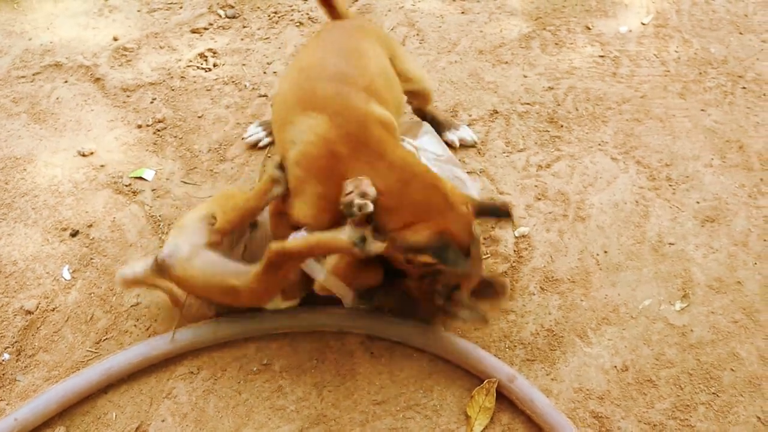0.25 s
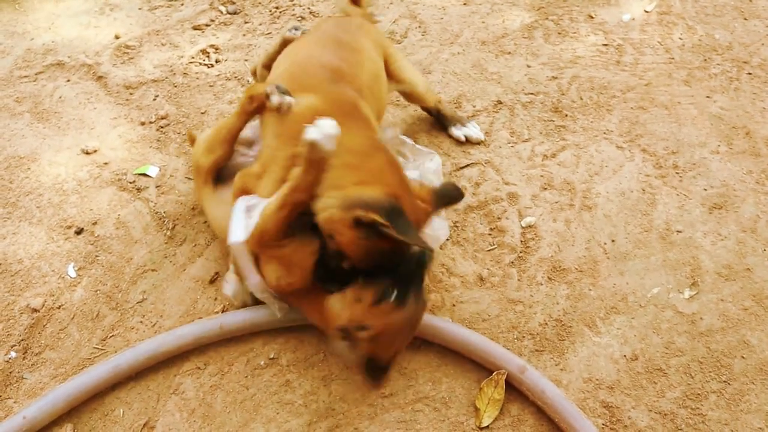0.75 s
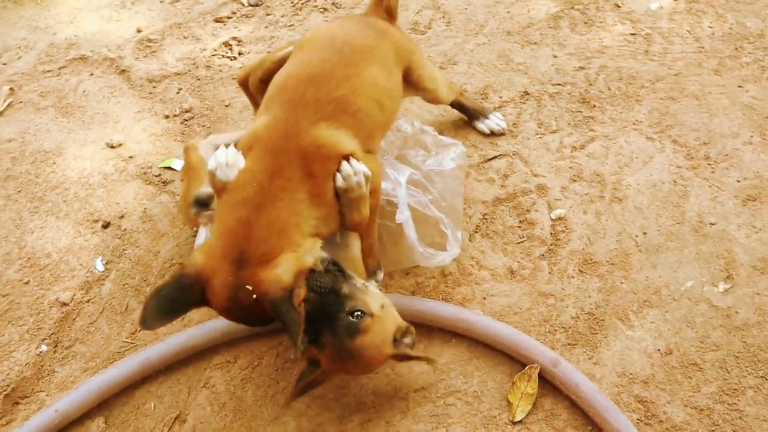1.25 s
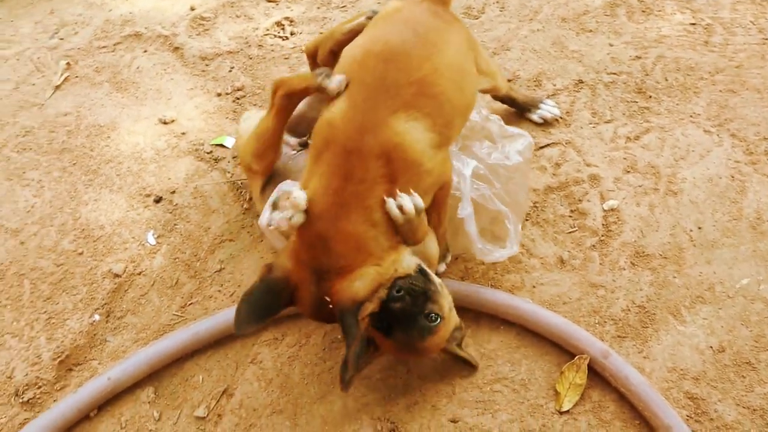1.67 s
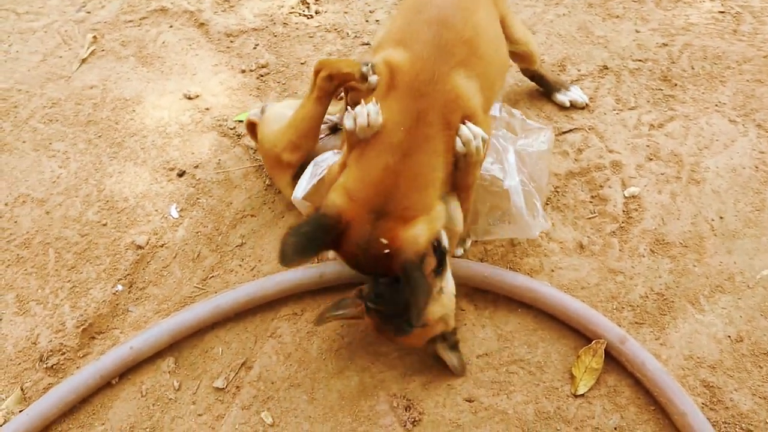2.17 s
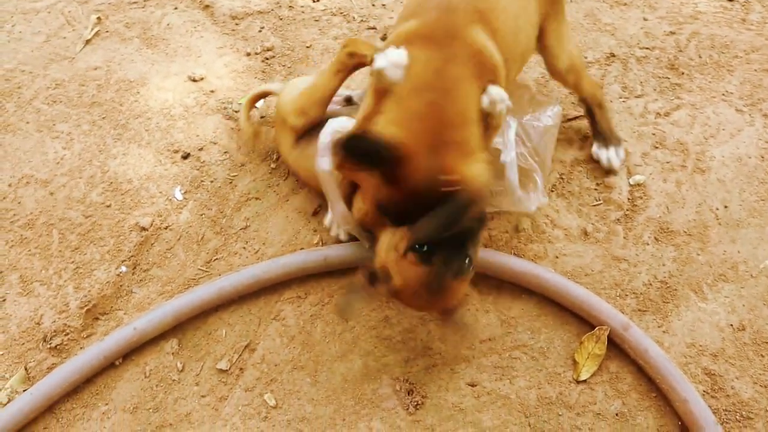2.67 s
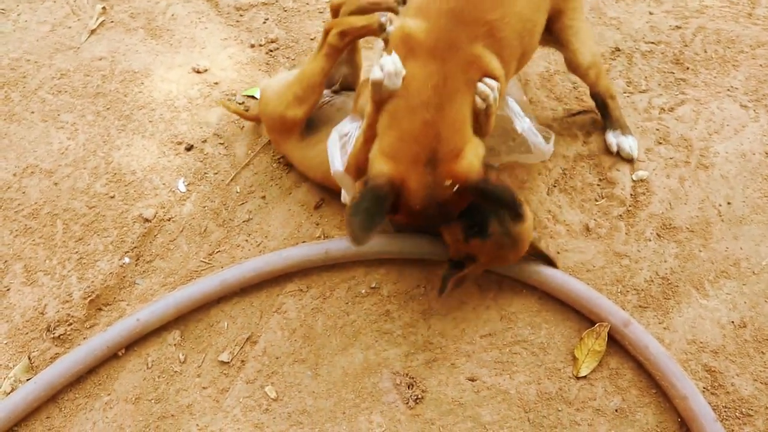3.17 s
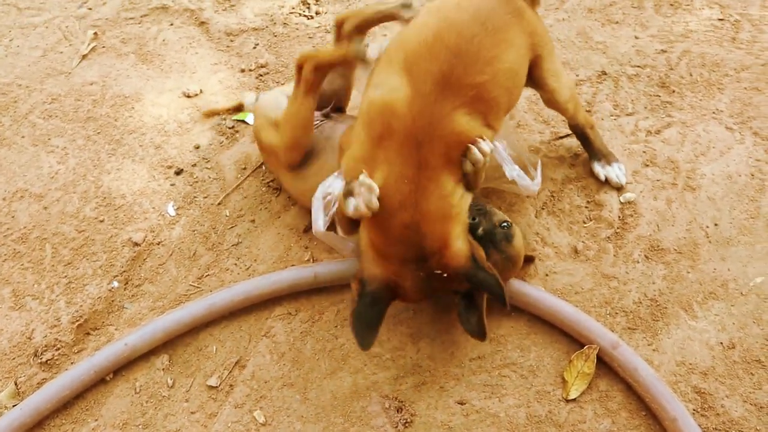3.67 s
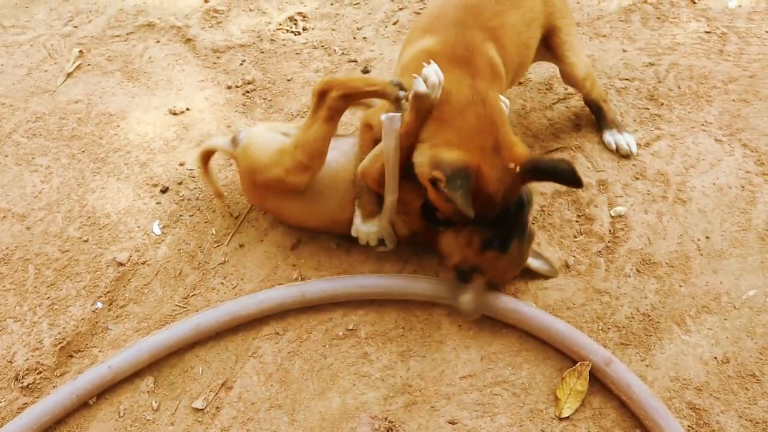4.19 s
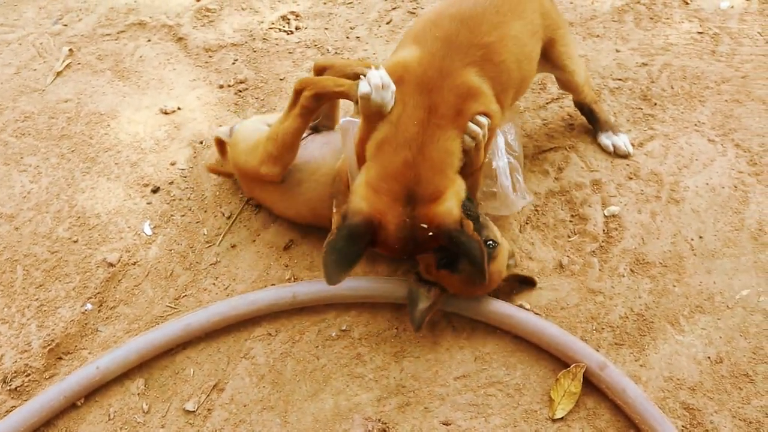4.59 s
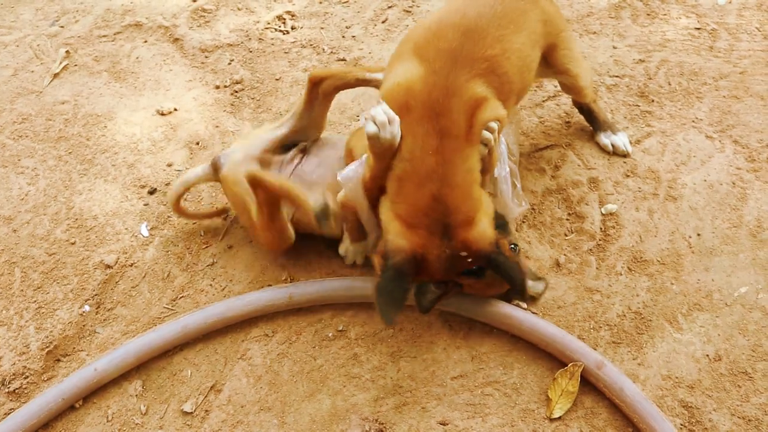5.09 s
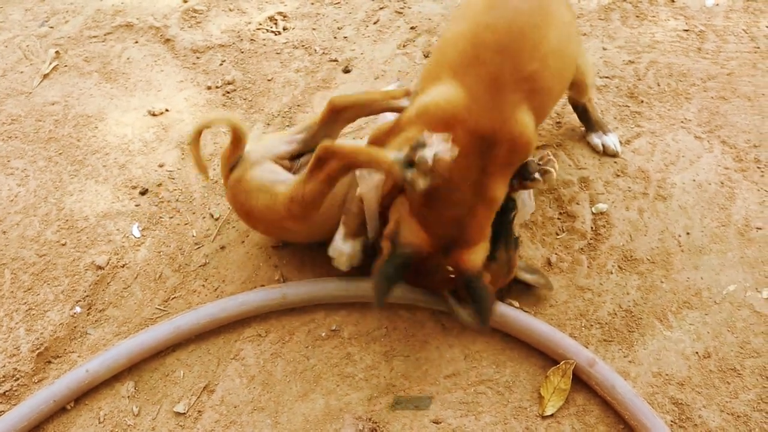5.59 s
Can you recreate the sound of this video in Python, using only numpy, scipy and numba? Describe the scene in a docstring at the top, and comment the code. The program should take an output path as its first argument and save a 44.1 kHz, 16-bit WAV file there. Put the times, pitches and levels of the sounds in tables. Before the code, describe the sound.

Two puppies growl and snarl in short rough bursts while wrestling, a plastic bag crackling beneath them and a small bird whistling in the background.

```python
"""Puppies wrestling over a plastic bag

Two puppies wrestle on bare earth, close to a pair of microphone ports. Vocal-fold puffs excite chest,
throat and mouth resonances: growls through shut jaws, snarls as they open; panting is filtered noise.
A plastic bag crackles as random impulses and ringing bursts. A bird whistles further off in gliding
sines, with a thin far tone, a wavering hum, filtered-noise wind and the steady air of a village yard."""
import sys
import numpy as np
from scipy import signal
from scipy.fft import rfft, irfft
from scipy.io import wavfile
from scipy.ndimage import uniform_filter1d
from numba import njit

SR = 44100
rng = np.random.default_rng(int(sys.argv[2]) if len(sys.argv) > 2 else 0)


def put_to_file(sound):
    """Save the sound as 16-bit audio at rate SR, in the file named by the first command-line argument."""
    columns = np.atleast_2d(sound).T  # one column per channel
    safe = np.clip(columns, -1, 1)
    whole_steps = np.round(safe * 32767)
    wavfile.write(sys.argv[1], SR, whole_steps.astype(np.int16))


N = 257984   # length in samples

# Growls, one curve a breath: t/s, throat level/dB, fold rate f/Hz, shut-mouth level over throat/dB
GROWLS = [
    [(0, -20.5, 188.7, -23), (.1, -27, 158.6, 0), (.26, -15.5, 283.2, -9.5), (.32, -24, 263.8, -6),
     (.39, -21, 250.6, -5.5), (.48, -21, 191.1, -10), (.505, -16.5, 215.3, -6), (.52, -28, 344.4, -25),
     (.56, -31, 263.8, -17), (.6, -26, 314.7, -11), (.65, -26.5, 352.5, -23), (.68, -23.5, 328, -12),
     (.7, -19.5, 336, -12.5), (.735, -31, 256.3, 1), (.76, -58, 238.3, -1)],
    [(.83, -33.5, 125.1, -16), (.88, -31, 113.8, -6.5), (.945, -25, 112.5, -8.5), (1.005, -28, 179.7, -35),
     (1.025, -52, 177.6, 0)],
    [(1.035, -30, 109.7, -6), (1.075, -32, 115.1, 4), (1.088, -44, 177.6, -13)],
    [(1.1, -40.5, 176.7, -25), (1.135, -27, 177, -11), (1.18, -30.5, 202.7, -25),
     (1.246, -20.5, 330.8, -12.5), (1.29, -28.5, 304.6, -13.5), (1.345, -26, 274.9, -16.5),
     (1.38, -37.5, 255.3, -12), (1.42, -74, 210.6, -6)],
    [(1.47, -50, 131, -9), (1.49, -28, 126.7, -7.5), (1.55, -26, 132.8, -6.5), (1.66, -23.5, 175.6, -7.5),
     (1.79, -24.5, 176.8, -5), (1.87, -20, 304.6, -11.5), (1.98, -29.5, 273.9, -16),
     (2.045, -27.5, 151.2, -15), (2.1, -22.5, 184.6, -34), (2.14, -25, 225.2, -13), (2.17, -29, 213.7, -14),
     (2.2, -27.5, 233.4, -2), (2.225, -27.5, 289.6, 4), (2.25, -35, 249.2, 0), (2.28, -33.5, 288.8, 9),
     (2.33, -32.5, 242.8, -5), (2.37, -33, 241.1, -14), (2.4, -40.5, 195, -16), (2.42, -51, 189.1, -16)],
    [(2.43, -35, 191.7, -7), (2.457, -38.5, 170, -9)],
    [(2.472, -37, 156.6, -11), (2.49, -36.5, 154.1, -5), (2.56, -32, 144.4, -7.5),
     (2.634, -35.5, 134.7, -4), (2.69, -29.5, 128.5, -3.5), (2.81, -36.5, 125, -10), (2.87, -30, 126, -9),
     (2.92, -34, 190.5, -9), (2.955, -28.5, 204.7, -0.5), (3.05, -36.5, 260.2, -16), (3.09, -44, 255.6, -2)],
    [(3.11, -38, 252.6, -10), (3.155, -26.5, 289.9, -40), (3.18, -30, 324.4, -9), (3.21, -27, 313.9, -13),
     (3.3, -30, 248.9, -13), (3.355, -29, 211, -11), (3.4, -59, 190.1, -17)],
    [(3.66, -26.5, 154.2, -22), (3.68, -36, 180, -13), (3.71, -28, 205.3, -14), (3.78, -25.5, 270.9, -10),
     (3.91, -26, 214.7, -9), (3.98, -21, 263.2, -13.5), (4.09, -23, 186, -25), (4.19, -24.5, 193.5, -14.5),
     (4.24, -24, 180.4, -7.5), (4.26, -23.5, 204.9, -23), (4.32, -22, 209.6, -16),
     (4.345, -25.5, 261.8, -14), (4.37, -34, 280.6, -16), (4.41, -31, 265.5, -16),
     (4.43, -35.5, 222.6, -20), (4.45, -44.5, 183, -22), (4.465, -64, 164.7, -13)],
    [(4.57, -65, 122.6, -11), (4.59, -39.5, 125.1, -8.5), (4.68, -36, 226.3, -14),
     (4.75, -30.5, 257.5, -2.5), (4.82, -29, 285.2, -3), (4.9, -25, 257.4, -16), (4.98, -31.5, 229.2, -12),
     (5.02, -30.5, 240, -29), (5.08, -29, 315.3, -13), (5.115, -33, 303.6, -21), (5.14, -54, 294, -9)],
    [(5.405, -40, 107.9, -30), (5.425, -32.5, 109.4, -11.5), (5.48, -31.5, 120, -13),
     (5.505, -30, 160, -11.5), (5.53, -26, 222.7, 1), (5.565, -23.5, 283.3, 1), (5.62, -26.5, 237.4, -11),
     (5.68, -25, 270.3, -13), (5.71, -21.5, 227.8, -11), (5.77, -29, 204.4, -4), (5.8, -27, 218.8, -2),
     (5.84, -19.5, 249.2, -7.5), (5.85, -20, 249.4, -8)],
]
# Irregular fold vibration: t/s, roughness (0-1), weakening of every other puff/dB
FOLD_ROUGHNESS = [(0, .62, 0), (.28, .55, 3), (.42, .45, 6), (.47, .55, 2), (.52, .36, 5), (.74, .36, 5),
                  (.8, .55, 0), (1.0, .5, 0), (1.04, .25, 0), (1.08, .25, 0), (1.14, .35, 0), (1.2, .55, 2),
                  (1.47, .45, 0), (1.62, .52, 0), (1.8, .6, 3), (2.03, .6, 2), (2.09, .3, 0), (2.14, .2, 0),
                  (2.2, .22, 1), (2.25, .42, 3), (2.4, .3, 2), (2.45, .55, 0), (2.87, .52, 0),
                  (2.92, .4, 0), (3.08, .4, 2), (3.12, .6, 0), (3.75, .6, 3), (4.17, .62, 2),
                  (4.23, .32, 0), (4.33, .3, 3), (4.4, .2, 1), (4.46, .18, 0), (4.58, .55, 0),
                  (4.75, .42, 2), (4.88, .4, 3), (4.92, .26, 0), (5.0, .34, 2), (5.1, .45, 4),
                  (5.45, .45, 0), (5.51, .25, 0), (5.57, .22, 0), (5.68, .3, 1), (5.8, .36, 1),
                  (5.85, .5, 0)]
# Low rough growl of the other puppy: t/s, source level against the first throat/dB, fold rate f/Hz
OTHER_PUPPY = [(0, -10, 130), (.5, -6, 150), (.75, -6, 140), (1.0, -20, 120), (2.05, -8, 130),
               (2.15, -5, 120), (2.4, -10, 130), (3.0, -8, 130), (4.15, -8, 110), (4.33, -2, 120),
               (4.45, -12, 120), (4.8, -4, 150), (5.05, -2, 140), (5.45, -20, 130), (5.55, 0, 160),
               (5.85, 0, 150)]
PUFF_SPREAD_DB, WEAK_PUFF_DB = 2.4, 3   # scales of the uneven puff strength that the mouth gets
# Flaps of the soft palate that chop the growl: first flap t/s, last flap t/s, flap rate f/Hz, depth/dB
PALATE_FLAPS = [(1.525, 1.601, 25.9, 6), (2.095, 2.131, 30.5, 6), (2.492, 2.602, 28.4, 7),
                (2.915, 3.042, 23.5, 9), (3.743, 4.026, 24.7, 8), (4.265, 4.409, 29.4, 4),
                (4.589, 4.692, 30.4, 7)]

# Chest and nose resonances: f/Hz, width/Hz, level/dB
CHEST = [(126, 98, 2), (265, 88, 1.5), (660, 38, -1.5)]
# Ringing of the throat added to the chest: t/s, level/dB (with the jaws shut)
THROAT_RING = [(0, 1), (.25, 7.5), (.55, -2), (.9, -11), (1.15, 1), (1.35, -20), (1.6, 8.5), (1.9, 3.5),
               (2.2, -4.5), (2.6, 2), (3.2, -2), (3.75, 4.5), (4.1, 5), (4.35, 9), (4.7, -0.5), (5.05, 4),
               (5.5, 4), (5.72, 3), (5.85, 6.5)]
# Pass band of the growl in chest and throat: lower f/Hz, upper f/Hz
THROAT_BAND_HZ = [148, 562]
THROAT_WIDTH_HZ, THROAT_EDGE_HZ = 140, 806
THROAT_HUSH = 0.5   # share of the throat's ring lost as the jaws open

# Resonances of the shut mouth: t/s, throat f/Hz, mouth f/Hz
SHUT_MOUTH = [(.08, 444, 1340), (.2, 563, 1100), (.3, 570, 1290), (.38, 545, 1360), (.45, 517, 950),
              (.69, 454, 1074), (.94, 564, 1310), (1.25, 465, 1260), (1.5, 570, 1300), (1.69, 620, 1510),
              (1.86, 605, 1362), (1.96, 440, 1230), (2.4, 447, 1450), (2.5, 550, 1380), (2.85, 504, 1240),
              (3.15, 480, 1440), (3.33, 550, 1610), (3.72, 494, 1130), (3.85, 552, 1155), (4.19, 448, 1480),
              (4.6, 596, 1377), (5.0, 450, 1450), (5.12, 495, 1642), (5.45, 502, 1440), (5.78, 480, 1420),
              (5.85, 610, 1380)]
# Snarls with the jaws open: start t/s, loudest t/s, end t/s, first level/dB, loudest level/dB,
# last level/dB, first mouth f/Hz, last mouth f/Hz, front-of-mouth level over mouth/dB
SNARLS = [(-.02, 0.014, 0.067, 2, -21.5, -21, 1590, 1540, -12),
          (0.19, 0.223, 0.22, -31, -24, -28, 1150, 1200, -22),
          (0.24, 0.27, 0.28, -27.5, -17.5, -24.5, 1360, 1430, -19.5),
          (0.326, 0.37, 0.42, -29, -28.5, -27, 1500, 1150, -16),
          (0.455, 0.516, 0.59, -21.5, -15.5, -31.5, 960, 1555, -15.5),
          (0.575, 0.608, 0.6, -29, -19, -15.5, 1600, 1650, -17.5),
          (0.707, 0.726, 0.74, -24, -19.5, -18.5, 1980, 2640, -14),
          (1.043, 1.073, 1.06, -21, -25, -26, 1937, 1490, -11),
          (1.135, 1.143, 1.165, -23, -16.5, -25, 1240, 1400, -20.5),
          (1.349, 1.38, 1.404, -41, -34, -37.5, 2410, 2552, -28),
          (2.091, 2.218, 2.295, -15.5, -14.5, -12.5, 1050, 1610, -15),
          (2.299, 2.359, 2.388, -26, -22.5, -29, 1510, 1670, -14.5),
          (2.898, 2.965, 3.066, -26.5, -16.5, -31, 990.4, 1470, -23),
          (4.251, 4.347, 4.437, -18, -10, -26, 1270, 1627, -17.5),
          (4.727, 4.778, 4.785, -33, -24.5, -21.5, 1420, 1520, -14.5),
          (4.788, 4.793, 4.93, -25.5, -19.5, -28.5, 1580, 1570, -15.5),
          (4.866, 4.884, 4.864, -22, -14.5, -18.5, 1540, 1520, -15),
          (4.905, 4.921, 5.006, -21, -15, -33.5, 1631, 1618, -11.5),
          (5.501, 5.566, 5.67, -26.5, -13.5, -32.5, 1480, 1766, -13),
          (5.634, 5.66, 5.76, -25.5, -20.5, -36, 1560, 1445, -12.5)]
JAWS_OPEN_S, JAWS_CLOSE_S = 0.0082, 0.0088   # time for the mouth to gain or lose 20 dB
JAW_GLIDE = 2.64   # above 1 the mouth resonance moves early in a snarl and then settles
SHUT_FRONT_DB = -16   # front-of-mouth drive against the shut mouth
FRONT_SWELL = 0.09   # extra dB of front drive for each dB of snarl

MOUTH_WIDTH_HZ, SLACK_WIDTH_HZ = 152, 280   # first of two resonators in cascade
TAUT_FROM_DB, TAUT_OVER_DB = -38, 12   # a quiet mouth rings broadly; it sharpens as it gets loud
MOUTH_LAG_S = 0.002022   # the mouth rings after the throat
# Side resonances of the cheeks: f/Hz, width/Hz, level with a slack mouth/dB, with a taut mouth/dB
CHEEKS = [(1037, 370, -9, -20), (2020, 405, -26.5, -17.5)]
# Second mouth resonance moved by the tongue: t/s, lowest f/Hz, level with the jaws open/dB
SECOND_MOUTH = [(0, 2530, 3), (.25, 2650, 1.5), (.5, 2760, -2), (.6, 2404, 4), (1.05, 2581, -2),
                (1.6, 2202, 5), (2.05, 2750, -6), (2.1, 2195, -1), (2.2, 2722, 0.5), (2.235, 2800, 4),
                (2.27, 2800, 0), (2.4, 2420, 4), (2.95, 2449, 3), (4.2, 2680, 2), (4.31, 2690, 0),
                (4.44, 2540, 4.5), (4.75, 2305, -0.5), (4.9, 2485, 1.5), (5.5, 2544, -5), (5.57, 2735, -2),
                (5.85, 2598, 0)]
SECOND_FOLLOWS = 1.42   # lowest ratio of the second mouth resonance to the first
# Muzzle resonances: f/Hz, width/Hz, level within the muzzle sound/dB
MUZZLE = [(3636, 500, -2.5), (4470, 440, -9.5), (6740, 1400, -1.5)]
MUZZLE_UNDER_DB = -14   # muzzle against the front drive where the second mouth table reads 0 dB
LUMPS_SHUT_DB, LUMPS_OPEN_DB, LUMPS_PER_S = 1.7, 1.6, 45

# Panting between growls: start t/s, end t/s, first level/dB, last level/dB
PANTS = [(0.776, 0.8, -73, -37), (1.39, 1.466, -40, -49), (3.325, 3.566, -40.5, -44),
         (3.538, 3.69, -51, -68), (5.202, 5.321, -55, -56)]
# Resonances of the panting mouth: f/Hz, width/Hz, relative level/dB
PANT_MODES = [(713, 110, 13.5), (1074, 950, 8.5), (2050, 120, 7), (2530, 180, -4), (3700, 1500, -4)]

# Pressure of the struggle on the bag: t/s, crackle level/dB
BAG_PRESSURE = [(0, -31), (.19, -41.5), (.5, -38), (1.0, -38), (1.3, -44), (1.7, -49.5), (2.0, -37.5),
                (2.33, -41), (2.44, -59.5), (2.74, -48.5), (3.04, -38), (3.27, -52.5), (3.7, -50),
                (3.76, -38.5), (4.37, -34.5), (4.4, -50), (4.63, -58), (4.93, -38.5), (5.03, -48),
                (5.31, -57.5), (5.55, -41.5), (5.85, -34.5)]
# Colour of the creases: f/Hz, relative level/dB
BAG_COLOUR = [(120, -25.5), (600, 8), (1200, 7.5), (2500, 1), (4000, -1.5), (5500, -8), (7500, -12.5),
              (10000, -20), (13000, -29.5), (15500, -35)]
# Crumpling by a paw or a body: loudest t/s, level/dB
CRUMPLES = [(.23, -41), (.49, -29), (.72, -26), (.8, -36.5), (.99, -34), (1.06, -32), (1.37, -34.5),
            (1.78, -40), (1.89, -35.5), (1.99, -38), (2.1, -32), (3.18, -46), (3.33, -38), (3.37, -45),
            (3.63, -48), (3.93, -43), (4.1, -36), (4.68, -48), (5.18, -45.5), (5.54, -30), (5.64, -34)]
CRUMPLE_RISE_DB_PER_S, CRUMPLE_FALL_DB_PER_S = 310, 288
# Sharp folds of the bag: t/s, peak level/dB, ring f/Hz
SNAPS = [(1.881, -45, 2215), (2.681, -37, 1992), (2.7377, -34, 1842), (3.1679, -31, 1950),
         (3.47, -39, 2190), (3.6975, -31, 2188), (3.7458, -27, 2328), (5.1293, -34.5, 2663),
         (5.1701, -44, 2530)]

# Phrases of the small bird: start t/s, level before the port gains/dB
BIRD_PHRASES = [(-.01, -49), (.972, -44), (1.92, -39), (2.942, -43), (4.655, -56)]
# Notes of the phrase: delay t/s, length t/s, first f/Hz, middle f/Hz, last f/Hz, level in phrase/dB
PHRASE_NOTES = [(-.015, .016, 3900, 4000, 3900, -6), (0, .036, 4700, 5600, 4900, -10),
                (.022, .016, 3900, 3900, 3800, -8), (.042, .02, 3900, 4050, 3800, -5),
                (.064, .036, 3600, 4600, 5050, -2)]
# Lone notes: start t/s, length t/s, first f/Hz, middle f/Hz, last f/Hz, level before the port gains/dB
LONE_NOTES = [(.12, .05, 4500, 4350, 4300, -48), (3.62, .05, 4800, 6000, 6700, -60)]

# Thin steady tone far off: t/s, f/Hz, level before the ports/dB
FAR_TONE = [(1.175, 1473, -45), (1.45, 1466, -41.5), (1.506, 1469, -46), (1.52, 1550, -31)]
# Hum: t/s, level/dB
HUM_LEVEL = [(0, -45), (.29, -59), (.7, -48), (1.73, -50.5), (2.2, -53), (2.3, -71.5), (3.08, -56),
             (3.39, -54.5), (3.65, -49), (3.98, -55), (4.2, -42), (4.38, -71), (4.6, -57), (4.94, -52),
             (5.2, -58), (5.42, -52), (5.74, -54)]
HUM_HZ = 52.2   # centre of the wavering pitch
# Puffs of wind: strongest t/s, level/dB
GUSTS = [(.29, -55), (1.99, -49), (3.62, -43.5), (4.2, -50), (4.94, -57), (5.26, -50), (5.85, -53)]
CALM_DB, GUST_FADES_DB_PER_S = -66, 94.5
# Colour of the yard air: f/Hz, relative level/dB
YARD_COLOUR = [(20, -25.5), (60, -10), (120, 11.5), (300, 6), (730, -10), (1100, -11), (2500, -18.5),
               (4000, -14), (8000, -55), (15000, -62)]
YARD_DB = -55

# Echoes off the ground and walls: delay t/s, level before any added gain/dB
ECHOES = [(0.014, -21), (0.031, -24), (0.059, -32), (.103, -36)]
# Phase of the left port against the right: f/Hz, lead/rad
PORT_LEAD = [(60, 0.65), (250, -.5), (430, -0.72), (1210, -0.73), (2150, -.75), (2930, -.85), (3530, -.4),
             (4500, 1.5), (7000, 1.2)]
# Level of the left port over the right: f/Hz, level/dB
PORT_LOUDER = [(60, 1.0), (94, 1.3), (150, 2.6), (230, 1.6), (360, 1.0), (560, 0.5), (880, 0.5), (1120, 0),
               (1600, -.9), (2300, .5), (3360, .3)]
STOP_HZ = 16000   # from here up the output is at least 70 dB down


def puppies():
    """Source-filter principle: fold puffs excite chest and throat, and mouth and muzzle as jaws open."""
    throat_db, fold_hz, shut_db = in_time(np.concatenate(GROWLS))
    throat_hz, shut_hz = in_time(SHUT_MOUTH)
    mouth_gain, front_gain, mouth_hz, opened = jaws(throat_db + shut_db, shut_hz)
    flaps = palate_flutter()
    rough, weaker_db = in_time(FOLD_ROUGHNESS)
    # the folds also beat faster while the air passes
    puffs, uneven, leak = folds(fold_hz * flaps ** (.4 * rough), rough, weaker_db)
    blown = np.roll(uneven + 2.57 * leak, round(MOUTH_LAG_S * SR))

    throat = puffs + .85 * leak + other_puppy()
    throat = throat_sound(throat, throat_hz, opened)
    taut = opened * np.clip((20 * np.log10(mouth_gain) - TAUT_FROM_DB) / TAUT_OVER_DB, 0, 1)
    mouth = mouth_sound(blown, mouth_hz, taut)
    front = front_sound(blown, mouth_hz, opened)
    voice = amp(throat_db) * evened(throat) + mouth_gain * evened(mouth) + front_gain * front

    # the breath catches in uneven lumps
    lumps_db = LUMPS_SHUT_DB + (LUMPS_OPEN_DB - LUMPS_SHUT_DB) * opened
    voice *= amp(lumps_db * np.clip(drift(LUMPS_PER_S), -3, 1))
    return voice * flaps * sounding(GROWLS, 0.007)


def folds(rate_hz, rough, weaker_db):
    """Pulsed airflow: a rounded puff each cycle; rough folds wander in rate and strength and leak air."""
    wander = np.exp(.8 * rough ** 2 * np.clip(drift(100), -2, 2))
    turns = np.floor(np.cumsum(rate_hz * wander) / SR)
    strength_db = 4 * rough * np.clip(drift(60), -3, 1) - weaker_db * (turns % 2)
    puffs = np.diff(turns, prepend=0) * amp(strength_db)
    # each puff is followed by a decaying burst of noise
    leak = rng.standard_normal(N) * signal.lfilter([1], [1, -.992], puffs)
    spread_db = PUFF_SPREAD_DB * np.clip(rng.standard_normal(N), -2, .7)
    weak_db = WEAK_PUFF_DB * (turns % 2) * np.clip(drift(12) + .5, 0, 2)
    uneven = puffs * amp(spread_db - weak_db)
    return filtered([puffs, uneven, .1 * rough * leak], 2, 3500)


def other_puppy():
    """Superposition: a second, rough set of folds adds its puffs under the clearer snarls."""
    other_db, other_hz = in_time(OTHER_PUPPY)
    other_puffs, _, other_leak = folds(other_hz, .62, 0)
    return amp(other_db) * (other_puffs + other_leak)


def palate_flutter():
    """Amplitude modulation: the flapping palate makes the gain dip between flaps."""
    t, db = np.arange(N) / SR, np.zeros(N)
    for first, last, per_s, depth_db in PALATE_FLAPS:
        fade = np.clip(np.minimum(t - first, last - t) / 0.013 + 1, 0, 1)
        db += depth_db * fade * (np.cos(2 * np.pi * per_s * (t - first)) / 2 - .2)
    return amp(db)


def jaws(shut_db, shut_hz):
    """Power summation: snarls take over; gives mouth gain, front gain, mouth resonance, share opened."""
    t = np.arange(N) / SR
    mouth, front = amp(shut_db) ** 2, amp(shut_db + SHUT_FRONT_DB) ** 2
    weighted_hz = mouth * shut_hz
    for start, top, end, first_db, top_db, last_db, first_hz, last_hz, front_db in SNARLS:
        edge = np.maximum((start - t) / JAWS_OPEN_S, (t - end) / JAWS_CLOSE_S)
        edge_db = 20 * np.maximum(edge, 0)
        top_s = np.clip(top, start, end)
        level_db = np.interp(t, [start, top_s, end], [first_db, top_db, last_db])
        power = amp(level_db - edge_db) ** 2
        remaining = np.clip((end - t) / (end - start), 0, 1)
        hz = last_hz + (first_hz - last_hz) * remaining ** JAW_GLIDE
        mouth = mouth + power
        front = front + power * amp(front_db + FRONT_SWELL * (level_db - top_db)) ** 2
        weighted_hz = weighted_hz + power * hz
    opened = 1 - amp(shut_db) ** 2 / mouth
    return np.sqrt(mouth), np.sqrt(front), weighted_hz / mouth, opened


def throat_sound(source, throat_hz, opened):
    """Parallel resonance: chest modes and a moving throat mode ring together within the low band."""
    ring = amp(in_time(THROAT_RING)[0]) * (1 - THROAT_HUSH * opened)
    throat = 0.5 * source + modes(source, CHEST) + ring * resonate(source, throat_hz, THROAT_WIDTH_HZ, SR)
    throat = filtered(throat, 2, THROAT_BAND_HZ, "band")
    return signal.sosfilt(signal.cheby1(5, 1, THROAT_EDGE_HZ, fs=SR, output="sos"), throat)


def mouth_sound(blown, mouth_hz, taut):
    """Damping: a slack mouth rings broadly, a taut one sharply; cheek resonances are subtracted."""
    sharp = twice_resonant(blown, mouth_hz, MOUTH_WIDTH_HZ, 595.0)
    slack = twice_resonant(blown, mouth_hz, SLACK_WIDTH_HZ * 1., 710.0)
    mouth = taut * sharp + 1.13 * (1 - taut) * slack
    for hz, width, slack_db, taut_db in CHEEKS:
        cheek = modes(modes(blown, [(hz, width, 0)]), [(hz, 2 * width, 0)])
        mouth -= amp(slack_db + (taut_db - slack_db) * taut) * cheek
    return mouth


def front_sound(blown, mouth_hz, opened):
    """Coupled resonance: a high first mouth mode pushes up the second; muzzle modes are subtracted."""
    second_hz, second_db = in_time(SECOND_MOUTH)
    second_hz = np.maximum(second_hz, SECOND_FOLLOWS * mouth_hz)
    second = twice_resonant(blown, second_hz, 340.0, 560.0)
    second = evened(second) * amp(second_db - 6.7 * (1 - opened))   # muffled by shut jaws
    broad = [(hz, 2 * width, 0) for hz, width, db in MUZZLE]
    muzzle = modes(modes(blown, MUZZLE), broad)
    return second - amp(MUZZLE_UNDER_DB + 1.8 * second_db) * evened(muzzle)


def panting():
    """Turbulent flow: unvoiced breath noise excites the resonances of the open mouth."""
    breath = filtered(rng.standard_normal(N), 2, 3500)
    air = modes(breath, PANT_MODES) * amp(5 * drift(14))
    spans = [[(start, first_db), (end, last_db)] for start, end, first_db, last_db in PANTS]
    return amp(in_time(np.concatenate(spans))[0]) * rms_one(air) * sounding(spans, 0.019)


def bag():
    """Impulsive excitation: clumped creases crackle on either side while sharp folds snap."""
    sizes = amp(3.0 * np.minimum(rng.exponential(1, (2, N)), 5)) * rng.choice([-1, 1], (2, N))
    creases = sizes * (rng.random((2, N)) < 7000 * amp(4.0 * drift(30)) / SR)
    creases = rms_one(coloured(creases + .15 * creases[::-1], BAG_COLOUR))   # some reaches the other side
    for edge_hz in (5500, 10000):   # the treble comes and goes in patches of its own
        creases = creases + (amp(3.5 * drift(4)) - 1) * filtered(creases, 4, edge_hz, "high")
    crumpled = swells(CRUMPLES, CRUMPLE_RISE_DB_PER_S, CRUMPLE_FALL_DB_PER_S)
    pressed = np.hypot(amp(in_time(BAG_PRESSURE)[0]), crumpled)
    return pressed * creases + bag_snaps()


def bag_snaps():
    """Transient resonance: each sharp fold is a short noise burst with a ring of its own."""
    length = 900
    snaps, t = np.zeros(N), np.arange(length) / SR
    for s, db, hz in SNAPS:
        noise = rng.standard_normal(length) * np.exp(-t / 0.0062)
        burst = resonate(noise, np.full(length, hz * 1.), 490.0, SR)
        burst = signal.lfilter([.4], [1, -.6], burst)
        snaps[round(s * SR):][:length] += amp(db) * burst / abs(burst).max()
    return snaps


def birds():
    """Frequency modulation: each hoarse whistle bends through three pitches; the walls throw it back."""
    out, hoarse = np.zeros(N), 1 + .02 * drift(250)
    notes = [(s + after, *shape, db + note_db)
             for s, db in BIRD_PHRASES for after, *shape, note_db in PHRASE_NOTES]
    for start, length, first, middle, last, db in notes + LONE_NOTES:
        u = np.arange(round(length * SR)) / (length * SR)
        at = max(round(start * SR), 0)
        bend = np.polyfit([0, .5, 1], [first, middle, last], 2)
        hz = np.polyval(bend, u) * hoarse[at:at + len(u)]
        whistle = np.sin(2 * np.pi * np.cumsum(hz) / SR)
        out[at:at + len(u)] += amp(db) * np.sqrt(np.sin(np.pi * u)) * whistle
    return echoed(out, louder_db=6)


def far_tone():
    """Harmonic addition: a sine with a faint octave."""
    hz, db = in_time(FAR_TONE)
    turn = 2 * np.pi * np.cumsum(hz) / SR
    tone = np.sin(turn) + 0.076 * np.sin(2 * turn)
    return amp(db) * np.sqrt(2) * tone * sounding([FAR_TONE], 0.034)


def hum():
    """Frequency modulation: a low sine wavers in pitch."""
    wave = np.sqrt(2) * np.sin(2 * np.pi * np.cumsum(HUM_HZ + 2.0 * drift(1.9)) / SR)
    return amp(in_time(HUM_LEVEL)[0]) * wave


def wind():
    """Band-limited noise: air rumbles on the ports and swells in puffs."""
    rumble = filtered(rng.standard_normal(N), 2, [20, 55], "band")
    gain = amp(CALM_DB) + swells(GUSTS, GUST_FADES_DB_PER_S, GUST_FADES_DB_PER_S)
    return gain * rms_one(rumble)


def yard():
    """Partial coherence: the steady air is partly alike in both ports."""
    mid, side = coloured(rng.standard_normal((2, N)), YARD_COLOUR)
    side = filtered(side, 1, 300, "high")   # the bass reaches both alike
    return amp(YARD_DB) * rms_one(mid + .5 * side * [[1], [-1]])


def echoed(x, louder_db=0):
    """Reflection: ground and walls return a few delayed, dull copies."""
    dull = signal.lfilter([.4], [1, -.6], x)
    return x + sum(amp(db + louder_db) * np.r_[np.zeros(round(delay_s * SR)), dull][:N]
                   for delay_s, db in ECHOES)


def ports(x):
    """Interaural-type difference: two ports hear a near source with their own phase and level."""
    hz = np.fft.rfftfreq(N, 1 / SR)
    half = amp(at_hz(PORT_LOUDER, hz) / 2) * np.exp(.5j * at_hz(PORT_LEAD, hz))
    return irfft(rfft(x) * [half, 1 / half], N)


def amp(db):
    """Logarithmic level: decibels to amplitude gain."""
    return 10 ** (np.asarray(db) / 20)


def rms_one(x):
    """Mean-square normalisation: scale to unit power."""
    return x / np.sqrt(np.mean(x ** 2) + 1e-20)


def evened(x, over_s=0.041):
    """Short-term normalisation: hold the power near 1, so that the effort alone sets the level."""
    return x / np.sqrt(uniform_filter1d(x ** 2, round(over_s * SR)) + 1e-12)


def in_time(rows):
    """Linear interpolation: columns of a table, one value a sample."""
    s, *columns = np.transpose(rows)
    return [np.interp(np.arange(N) / SR, s, c) for c in columns]


def sounding(tables, fade_s):
    """Gating: gain 1 inside the spans of the tables, 0 between, with smoothed edges."""
    t = np.arange(N) / SR
    inside = sum((t >= rows[0][0]) & (t < rows[-1][0]) for rows in tables)
    return uniform_filter1d(np.minimum(inside, 1.), round(fade_s * SR))


def swells(rows, rise_db_per_s, fall_db_per_s):
    """Exponential growth and decay: events swell to a peak and die away, adding in power."""
    t = np.arange(N) / SR
    power = 0
    for s, db in rows:
        below_db = np.maximum((s - t) * rise_db_per_s, (t - s) * fall_db_per_s)
        power = power + amp(db - below_db) ** 2
    return np.sqrt(power)


def drift(rate_hz):
    """Low-passed noise: slow chance of spread 1."""
    return rms_one(filtered(rng.standard_normal(N), 2, rate_hz))


def filtered(x, order, edge_hz, kind="low"):
    """Band limitation: a Butterworth filter."""
    return signal.sosfilt(signal.butter(order, edge_hz, kind, fs=SR, output="sos"), x)


def at_hz(points, hz):
    """Logarithmic frequency: read a spectrum on a log axis."""
    at, value = np.transpose(points)
    return np.interp(np.log(hz + 1), np.log(at + 1), value)


def coloured(x, spectrum):
    """Spectral shaping: apply a dB curve in the frequency domain."""
    return irfft(rfft(x) * amp(at_hz(spectrum, np.fft.rfftfreq(N, 1 / SR))), N)


@njit
def resonate(x, hz, width_hz, sr):
    """Damped resonance: a pole pair whose centre may move, with gain about 1 on top."""
    y = np.zeros(len(x))
    r = np.exp(-np.pi * width_hz / sr)
    for i in range(2, len(x)):
        drive = (1 - r * r) / 2 * (x[i] - x[i - 2])
        y[i] = drive + 2 * r * np.cos(2 * np.pi * hz[i] / sr) * y[i - 1] - r * r * y[i - 2]
    return y


def twice_resonant(x, hz, width_hz, second_width_hz):
    """Cascaded resonance: two resonators in series give steep skirts."""
    return resonate(resonate(x, hz, width_hz, SR), hz, second_width_hz, SR)


def modes(x, table):
    """Modal superposition: fixed resonances side by side."""
    return sum(amp(db) * resonate(x, np.full(N, hz * 1.), width, SR) for hz, width, db in table)


def scene():
    """Superposition: the dogs with their echoes, and the yard around them."""
    dogs = echoed(puppies() + panting())
    near_and_tone = ports(far_tone() - dogs)   # the dogs enter with inverted polarity
    bird_gain = amp([[4], [-7]])   # louder in the left port
    return near_and_tone + bag() + birds() * bird_gain + hum() + wind() + yard()


def record(dry):
    """Saturation and band limitation: the highest peaks are rounded, the top is cut."""
    rounded = dry / (1 + np.abs(dry / .9) ** 4) ** .25
    return signal.sosfilt(signal.cheby2(12, 70, STOP_HZ, fs=SR, output="sos"), rounded)


dry = scene()
out = record(dry)
put_to_file(out)
```